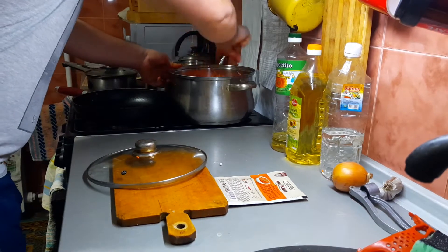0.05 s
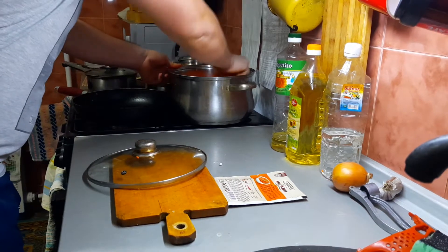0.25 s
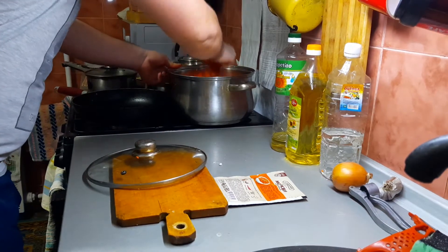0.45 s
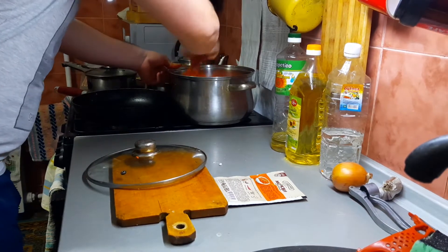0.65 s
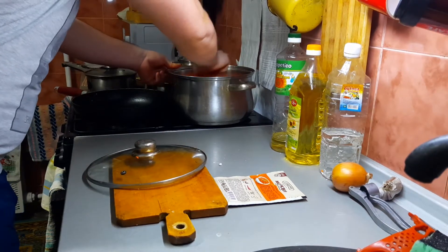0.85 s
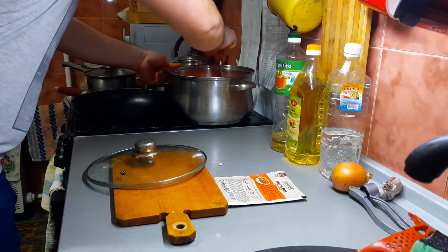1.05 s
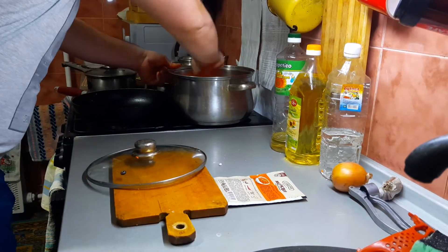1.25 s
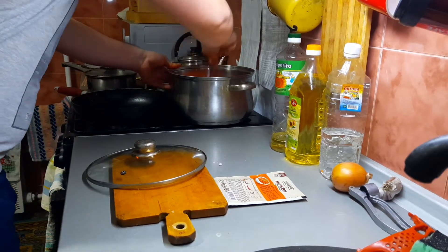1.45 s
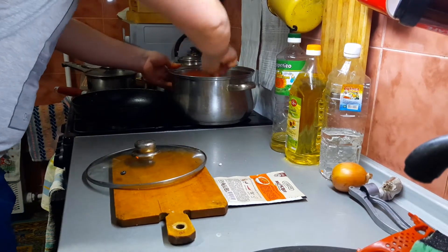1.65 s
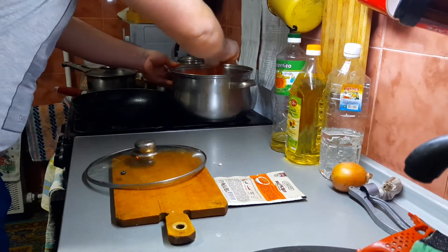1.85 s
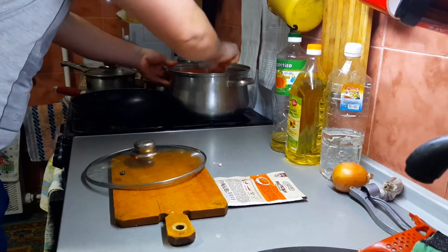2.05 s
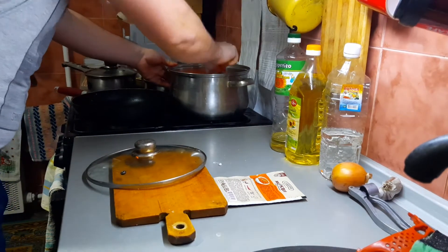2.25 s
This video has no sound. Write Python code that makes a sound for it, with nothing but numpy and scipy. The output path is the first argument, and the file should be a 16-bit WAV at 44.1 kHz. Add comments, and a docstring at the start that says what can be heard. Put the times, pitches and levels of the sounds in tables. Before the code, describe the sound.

Hands knead wet grated carrot in a steel pot: crackling squeezes, an early metallic knock with a hollow squelch, dull rubs and thuds, then a loud juddering scrape; small tiled kitchen, low hum, stereo microphone fairly close.

```python
"""Hands knead grated carrot in a steel pot on a stove, in a small quiet kitchen with a low steady hum.
First a hand rubs the pot wall and wet shreds crackle and fizz: random impacts and filtered noise.
Soon the pot knocks on its support, with a thud and a hollow squelch: noise bursts, modes and a sagging tone.
More squeezes, rubs and thudding pushes follow; then the pot scrapes as it is shifted, with squeaks and
slowing judder: friction impacts, rough tones and a train of slips. A last rub ends it; tiled walls ring briefly."""
import sys
import numpy as np
from scipy import signal
from scipy.fft import rfft, irfft, next_fast_len
from scipy.io import wavfile

SR = 44100
rng = np.random.default_rng(int(sys.argv[2]) if len(sys.argv) > 2 else 0)


def wav_record(signal):
    """Record a signal, one row per channel, as 16-bit PCM in the file named by sys.argv[1]."""
    frames = np.transpose(np.atleast_2d(signal))
    bounded = np.clip(frames, -1, 1)
    # unit amplitude maps onto the largest positive 16-bit level
    quanta = np.round(bounded * 32767).astype(np.int16)
    wavfile.write(sys.argv[1], SR, quanta)


N = 101429


def undb(db):
    """Logarithmic levels: decibels to amplitude gain."""
    return 10 ** (np.asarray(db) / 20)


def unit(x):
    """Normalisation of power: scale to rms 1."""
    return x / np.sqrt(np.mean(x ** 2) + 1e-18)


def clock():
    """Sampling: the time of every sample in s."""
    return np.arange(N) / SR


def convolve(x, response):
    """Linear superposition: pass a sound through an impulse response."""
    size = next_fast_len(2 * N)
    return irfft(rfft(x, size) * rfft(response, size), size)[..., :N]


def at_points(freqs, points):
    """Interpolation of (f/Hz, level/dB) points along log frequency."""
    hz, db = np.array(points, float).T
    return np.interp(np.log(freqs), np.log(hz), db)


def tone(points):
    """Minimum phase: causal response of energy 1 with the given (f/Hz, level/dB) colour."""
    size = 8192
    freqs = np.maximum(np.fft.rfftfreq(size, 1 / SR), 1)
    cepstrum = irfft(np.log(undb(at_points(freqs, points))))
    # folding the cepstrum onto positive times makes the response causal
    cepstrum[1:size // 2] *= 2
    cepstrum[size // 2 + 1:] = 0
    response = irfft(np.exp(rfft(cepstrum)))
    return response / np.linalg.norm(response)


def ring(modes):
    """Modal superposition: decaying sines of total energy 1; level/dB is each mode's share of energy."""
    t = clock()[:SR // 2]
    response = 0
    for hz, db, t60 in modes:
        decay = undb(db - 60 * t / t60) / np.sqrt(t60)
        response = response + decay * np.sin(2 * np.pi * hz * t)
    return response / np.linalg.norm(response)


def band(x, edge_hz, kind):
    """Frequency selection: Butterworth low-, high- or band-pass."""
    sections = signal.butter(N=3, Wn=edge_hz, btype=kind, fs=SR, output="sos")
    return signal.sosfilt(sections, x)


def clicks(per_s, spread_db):
    """Random impulse process: tiny impacts of uneven size and either sign, rms 1."""
    hit = rng.random(N) < per_s / SR
    sign = rng.choice([-1, 1], N)
    size = undb(spread_db * np.minimum(rng.exponential(size=N), np.pi))
    return unit(hit * sign * size)


def waver(per_s):
    """Slow random modulation: straight lines between random values, rms 1."""
    steps = np.arange(N) * per_s / SR
    return unit(np.interp(steps, np.arange(N), rng.standard_normal(N)))


def swells(rows):
    """Amplitude envelope: a rounded rise and fall for each (t/s, length/s, level/dB) row."""
    total = 0
    for start, length, db in rows:
        progress = np.clip((clock() - start) / length, 0, 1)
        total = total + undb(db) * np.sqrt(np.abs(np.sin(np.pi * progress)))
    return total


JITTER_SHARE, JITTER_PER_S, FLUTTER_DB = 0.032, 800, 3


def strand(hz):
    """Frequency and amplitude modulation: one rough, fluttering tone along a pitch curve, rms 1."""
    jittered_hz = hz * (1 + JITTER_SHARE * waver(JITTER_PER_S))
    phase = 2 * np.pi * np.cumsum(jittered_hz) / SR
    return unit(np.sin(phase) * undb(FLUTTER_DB * waver(per_s=150)))


# stereo width at the microphones: f/Hz, side minus mid level/dB
WIDTH = [(60, -5), (250, -2.5), (600, -3.5), (1300, 2), (3000, 1.5), (15000, 2)]


def diffuse():
    """Diffuse field: stereo noise whose channels are more alike in the bass than in the treble."""
    mid, side = rng.standard_normal((2, N))
    side_db = at_points(np.fft.rfftfreq(N, 1 / SR) + 1, WIDTH)
    side = irfft(rfft(side) * undb(side_db), N)
    return unit(np.array([mid + side, mid - side]))


ROOM_T60_S, ROOM_TREBLE_T60_S = 0.33, 0.25
ROOM_SPLIT_HZ, ROOM_BUILD_S = 3030, 0.0013


def kitchen(x, wet_db):
    """Exponential reverberation: direct sound plus dense tiled-room reflections, power kept."""
    t, noise = clock(), diffuse()
    low = band(noise, ROOM_SPLIT_HZ, "low") * np.exp(-np.log(1000) * t / ROOM_T60_S)
    high = band(noise, ROOM_SPLIT_HZ, "high") * np.exp(-np.log(1000) * t / ROOM_TREBLE_T60_S)
    tail = (low + high) * (1 - np.exp(-t / ROOM_BUILD_S))
    tail /= np.sqrt(np.sum(tail ** 2) / 2)
    wet = undb(wet_db) * convolve(x, tail)
    return (x + wet) / np.hypot(1, undb(wet_db))


# spectrum of the steady room noise: f/Hz, relative level/dB
FLOOR_COLOUR = [(20, -77), (40, -20), (62, 0.5), (102, -10), (126, 1), (160, -8), (200, 0), (225, -17),
                (310, 3), (400, -4.5), (500, -12.5), (650, -17.5), (850, -4.5), (1000, -15), (1300, -16),
                (1700, -22), (2550, -16.5), (4300, -30.5), (4900, -24), (9500, -31.5), (12500, -38),
                (15500, -36.5)]
# appliance hum: f/Hz, level/dB
HUM = [(99.5, -69.5), (149, -74.5)]
FLOOR_DB = -61.5


def background():
    """Stationary noise and steady sines: diffuse room noise with an appliance hum."""
    hum = 0
    for hz, db in HUM:
        turns = hz * clock() + rng.random()
        hum = hum + undb(db) * np.sqrt(2) * np.sin(2 * np.pi * turns)
    return undb(FLOOR_DB) * unit(convolve(diffuse(), tone(FLOOR_COLOUR))) + hum


# soft pushes: t/s, length/s, level/dB
THUDS = [(0.237, 0.045, -45.5), (0.28, 0.12, -43.5), (1.255, 0.1, -56.5), (1.42, 0.097, -52),
         (1.485, 0.06, -50), (1.73, 0.13, -64)]
# low booming modes of the thuds: f/Hz, relative level/dB, t60/s
THUD_MODES = [(57.7, 10, 0.93), (108.4, -1.5, 0.15), (132, -4, 0.1)]
# the hand on the pot wall: t/s, length/s, level/dB
RUBS = [(0.0, 0.24, -56.5), (0.362, 0.04, -45.5), (0.48, 0.25, -63), (0.92, 0.27, -62), (2.26, 0.11, -57.5)]
# spectrum of the rubbing: f/Hz, relative level/dB
RUB_COLOUR = [(50, -80), (150, -50), (230, -0.5), (305, 10), (400, -1), (560, -9), (780, -0.5), (1100, -22),
              (1330, -5), (1800, -40), (6000, -39)]
THUD_LOW_HZ = 46.6


def hands():
    """Resonance and sliding friction: pushes thud in low booming modes, the hand rubs dully on the pot."""
    thuds = unit(convolve(rng.standard_normal(N), ring(THUD_MODES))) * swells(THUDS)
    friction = clicks(per_s=900, spread_db=4.0) * swells(RUBS)
    rubs = convolve(friction, tone(RUB_COLOUR))
    return kitchen(band(thuds, THUD_LOW_HZ, "high"), wet_db=2.0) + kitchen(rubs, wet_db=-2.0)


# wet rubbing on steel: t/s, length/s, first f/Hz, last f/Hz, level/dB
SQUEAKS = [(0.141, 0.031, 2070, 1960, -61), (0.372, 0.027, 957, 1014, -56), (0.355, 0.039, 1300, 1310, -53),
           (1.599, 0.19, 2635, 2468, -57), (1.636, 0.075, 722, 710, -45), (1.692, 0.075, 547.4, 543.7, -44),
           (1.703, 0.034, 818, 693, -42), (1.738, 0.057, 2010, 2000, -46.5),
           (1.743, 0.093, 5900, 5950, -44.5), (1.762, 0.045, 3600, 3550, -43), (1.797, 0.08, 820, 719, -38),
           (1.814, 0.0426, 4600, 4680, -44.5), (1.83, 0.065, 1290, 1330, -37), (1.89, 0.044, 740, 792, -41),
           (1.945, 0.049, 2190, 2078, -49)]
SQUEAK_WET_DB = -0.5


def squeaks():
    """Friction-driven oscillation: wet friction catches briefly on one rough pitch that slides."""
    out = 0
    for start, length, first_hz, last_hz, db in SQUEAKS:
        pitch_hz = np.interp(clock(), [start, start + length], [first_hz, last_hz])
        out = out + strand(pitch_hz) * swells([(start, length, db)])
    return kitchen(out, SQUEAK_WET_DB)


# slips of the dragged pot: t/s, slip rate f/Hz, level/dB
JUDDER = [(1.80, 150.4, -64), (1.835, 146.8, -43.5), (1.89, 125.3, -48), (1.945, 99, -43.5),
          (2.02, 64.4, -42.5), (2.07, 55.37, -51.5), (2.13, 49.6, -62)]
# spectrum of one slip: f/Hz, relative level/dB
JUDDER_COLOUR = [(30, -33), (60, 3), (145, 3), (215, -4.5), (340, 1), (600, -10), (1250, -16.5),
                 (15000, -50)]
JUDDER_JITTER_SHARE, JUDDER_SCATTER_DB, JUDDER_WET_DB = 0.0292, 4, -6
CHATTER_PER_S = 60  # rate of the random wander in judder and scrape


def judder():
    """Relaxation oscillation: quick slips slow as the pot comes to rest, bumping stove and steel."""
    times, rate_hz, db = np.array(JUDDER).T
    jittered_hz = np.interp(clock(), times, rate_hz) * (1 + JUDDER_JITTER_SHARE * waver(CHATTER_PER_S))
    turns = np.cumsum(jittered_hz) / SR
    # one impulse at each completed turn
    slips = np.diff(np.floor(turns), prepend=0)
    hops = unit(slips * undb(JUDDER_SCATTER_DB * waver(CHATTER_PER_S)))
    force = undb(np.interp(clock(), times, db, left=-np.inf, right=-np.inf))
    return kitchen(convolve(hops * force, tone(JUDDER_COLOUR)), JUDDER_WET_DB)


# course of the scrape: t/s, groan level/dB, rasp level/dB, grit level/dB
SCRAPE = [(1.58, -62.5, -74.5, -81), (1.672, -49, -57.5, -65.5), (1.717, -45, -51.5, -57.5),
          (1.753, -41.5, -38, -42), (1.827, -33, -29, -30), (1.911, -33, -35, -41),
          (1.955, -40, -40.5, -50), (2.02, -48.5, -57, -57), (2.07, -49.5, -90, -83),
          (2.13, -100, -100, -100)]
# spectrum of the grinding: f/Hz, relative level/dB
SCRAPE_COLOUR = [(40, -31.5), (100, -6.5), (143, -5), (218, -15.5), (300, -3.5), (400, 1), (640, -8.5),
                 (770, -0.5), (920, -9.5), (1280, -8), (1550, -13), (2050, -8), (2800, -13.5),
                 (3900, -18.5), (4600, -16.5), (5200, -20.5), (6100, -15.5), (7000, -22.5), (9000, -25),
                 (10000, -30), (12500, -26), (15500, -31.5)]
# modes of the dragged pot: f/Hz, relative level/dB, t60/s
SCRAPE_MODES = [(312.5, 0, .4), (363, 2, .4), (396, -1, .3), (457.5, -4, .3), (548, -5, .3),
                (624.5, -5, .3), (730, 0, .35), (785, -3, .35), (851.5, -3, .35), (1332, -2, .2),
                (2082, -2, .14), (2525, -8, .15), (5907, -4, .09)]
GROAN_TOP_HZ, RASP_TOP_HZ = 1000, 4270
SLIPS_PER_S, SLIP_SPREAD_DB, CHATTER_DB = 1100, 3, 4
SCRAPE_RING_DB, SCRAPE_WET_DB = -3.5, 3.5


def scrape():
    """Stick-slip friction: the pot drags over its support, groaning first, then with rasp and grit."""
    slips = clicks(SLIPS_PER_S, SLIP_SPREAD_DB) * undb(CHATTER_DB * waver(CHATTER_PER_S))
    rough = convolve(slips, tone(SCRAPE_COLOUR))
    rings = undb(SCRAPE_RING_DB) * convolve(diffuse(), ring(SCRAPE_MODES))
    times, *levels = np.array(SCRAPE).T
    edges = [(GROAN_TOP_HZ, "low"), ([GROAN_TOP_HZ, RASP_TOP_HZ], "band"), (RASP_TOP_HZ, "high")]
    grind, steel = 0, 0
    for edge, db in zip(edges, levels):
        gain = undb(np.interp(clock(), times, db)) / np.std(band(rough + rings, *edge))
        grind = grind + gain * band(rough, *edge)
        steel = steel + gain * band(rings, *edge)
    return kitchen(grind, SCRAPE_WET_DB) + steel


CONTACT_S = 0.0016  # decay of a knock contact, and rise of the squelch
SQUELCH_START_HZ, SQUELCH_END_HZ, SQUELCH_SAG_S = 449, 256.6, 0.0247
SQUELCH_T60_S, SQUELCH_DB = 0.18, -37


def squelch():
    """Damped gliding resonance: the wet mass squashed at the knock gives a hollow note that sags."""
    age = np.maximum(clock() - KNOCK[0][0], 0)
    hz = SQUELCH_END_HZ + (SQUELCH_START_HZ - SQUELCH_END_HZ) * np.exp(-age / SQUELCH_SAG_S)
    swell = (1 - np.exp(-age / CONTACT_S)) * np.exp(-np.log(1000) * age / SQUELCH_T60_S)
    return kitchen(undb(SQUELCH_DB) * swell * strand(hz), wet_db=-16)


# contacts as the pot settles: t/s, relative level/dB
KNOCK = [(0.2358, -1.5), (0.2381, 2), (0.241, 5), (0.2507, -3), (0.286, -10.5), (0.3, -6)]
# spectrum of the contacts: f/Hz, relative level/dB
KNOCK_COLOUR = [(35, -26), (100, -7.5), (240, -37), (420, -5.5), (570, -14), (740, 7), (980, -20),
                (1400, -12.5), (1700, -6), (2280, -6), (2520, -17.5), (2850, -11), (3350, -1), (3750, -9.5),
                (4200, -10), (4680, -21), (5400, -6), (7200, -8.5), (8000, -20.5), (10500, -27.5),
                (11600, -14), (12800, -16), (14200, -29), (15500, -28)]
# modes of the struck pot: f/Hz, relative level/dB, t60/s
KNOCK_MODES = [(307, -8, .5), (382, -4, .2), (745, 3, .11), (1655, -6, .1), (1886, -5, .22), (2081, 1, .12),
               (2176, -6, .1), (3080, -6, .1), (3320, -7, .1), (3519, -5, .1), (5485, -8, .15),
               (5920, -7, .17), (6270, -5, .2), (7277, -3, .25)]
KNOCK_DB, KNOCK_RING_DB, KNOCK_WET_DB = 8, -7.5, 3
KNOCK_LOW_HZ, KNOCK_SPREAD_HZ = 320, 1460


def knock():
    """Impact excitation: a few quick contacts crack against the support and ring the pot's modes."""
    t, push = clock(), 0
    for start, db in KNOCK:
        push = push + undb(db) * (t >= start) * np.exp(-np.abs(t - start) / CONTACT_S)
    push = push / np.linalg.norm(push)
    crack = convolve(rng.standard_normal(N) * push, tone(KNOCK_COLOUR))
    spread = convolve(diffuse() * push, tone(KNOCK_COLOUR))
    # the bass is the same at both microphones, the treble is diffuse
    body = band(crack, KNOCK_SPREAD_HZ, "low") + band(spread, KNOCK_SPREAD_HZ, "high")
    blow = np.zeros(N)
    blow[int(KNOCK[0][0] * SR)] = 1
    rings = undb(KNOCK_RING_DB) * band(convolve(blow, ring(KNOCK_MODES)), KNOCK_LOW_HZ, "high")
    return undb(KNOCK_DB) * (kitchen(body, KNOCK_WET_DB) + kitchen(rings, wet_db=-5))


# squeezes of the wet shreds: t/s, hold/s, crackle level/dB, fizz level/dB
SQUEEZES = [(0.074, 0.023, -50.5, -65.5), (0.136, 0.0067, -54.5, -56), (0.269, 0.042, -38.5, -49),
            (0.421, .006, -64, -56.5), (0.456, 0.0084, -46, -68), (0.501, 0.01, -55, -66),
            (0.556, 0.037, -55.5, -61), (0.916, 0.029, -48.5, -59), (0.942, 0.032, -45.5, -60),
            (0.987, 0.028, -55.5, -75), (1.029, 0.007, -55.5, -84), (1.161, 0.0072, -55.5, -72),
            (1.369, 0.12, -69.5, -64.5)]
# spectrum of the crackling shreds: f/Hz, relative level/dB
CRACKLE_COLOUR = [(50, -8), (200, -3.5), (380, 11), (600, -45), (980, 1), (1150, -7), (1380, -3),
                  (2100, -11.5), (3050, 2), (3500, -6.5), (4100, 0.5), (5000, -6.5), (6400, 2), (8000, -8),
                  (10500, -20.5), (15500, -19)]
# spectrum of the fizzing juice: f/Hz, relative level/dB
FIZZ_COLOUR = [(1000, -30), (5000, -19), (10000, -8), (12500, 0), (15500, -5)]
SQUEEZE_ATTACK_SHARE, SQUEEZE_RELEASE_S, SQUEEZE_WET_DB = 0.13, 0.0029, 8.5  # attack as share of the hold
CRACKLES_PER_S, CRACKLE_SPREAD_DB = 1500, 1.5
IDLE_CRACKLE_DB, IDLE_FIZZ_DB = -77.5, -74.5


def carrot():
    """Fracture impulses and flow noise: squeezes snap shreds and press out juice; faint between."""
    t, crackle, fizz = clock(), undb(IDLE_CRACKLE_DB), undb(IDLE_FIZZ_DB)
    for start, hold, crackle_db, fizz_db in SQUEEZES:
        attack = np.clip((t - start) / (SQUEEZE_ATTACK_SHARE * hold), 0, 1)
        release = np.exp(-np.maximum(t - start - hold, 0) / SQUEEZE_RELEASE_S)
        grip = attack * release
        crackle = crackle + undb(crackle_db) * grip
        fizz = fizz + undb(fizz_db) * grip
    shreds = convolve(crackle * clicks(CRACKLES_PER_S, CRACKLE_SPREAD_DB), tone(CRACKLE_COLOUR))
    juice = convolve(fizz * rng.standard_normal(N), tone(FIZZ_COLOUR))
    return kitchen(shreds + juice, SQUEEZE_WET_DB)


# stereo balance at the microphones: f/Hz, left minus right level/dB
LEAN = [(60, -3.5), (150, -5.5), (380, -3.5), (1200, 2), (2400, -1), (5000, -3.5), (15000, -4.5)]


def scene():
    """Superposition of all sources, with a level difference leaning right in the bass and treble."""
    lean_db = at_points(np.fft.rfftfreq(N, 1 / SR) + 1, LEAN)
    mix = knock() + squelch() + scrape() + judder() + squeaks() + carrot() + hands() + background()
    return irfft(rfft(mix) * undb(np.array([lean_db, -lean_db]) / 2), N)


TOP_HZ = 15750


def record(dry):
    """Band limitation: the recorder cuts the top steeply with an elliptic low-pass."""
    return signal.sosfilt(signal.ellip(10, .2, 80, TOP_HZ, fs=SR, output="sos"), dry)


dry = scene()
out = record(dry)
wav_record(out)
```